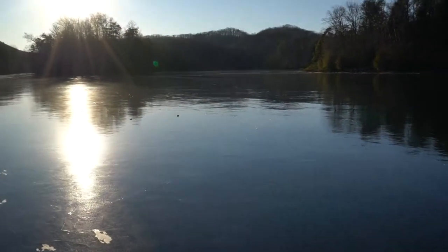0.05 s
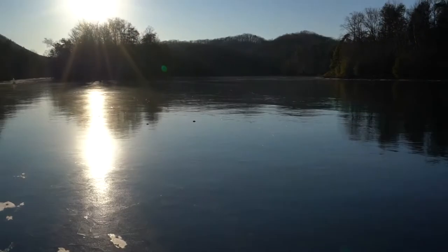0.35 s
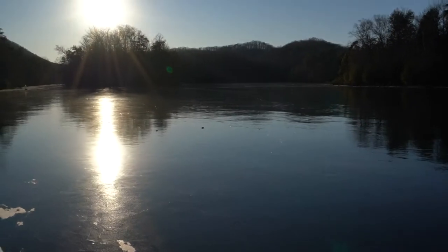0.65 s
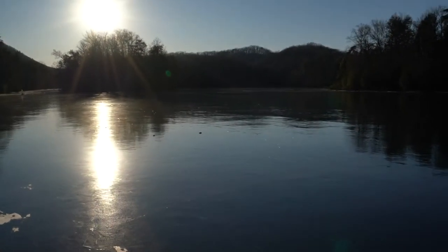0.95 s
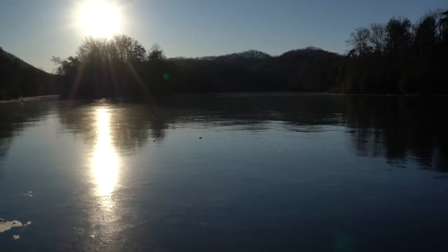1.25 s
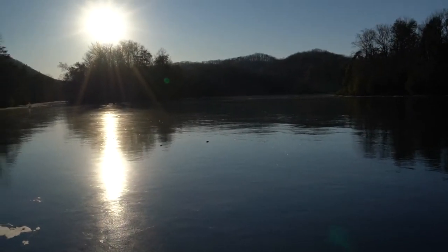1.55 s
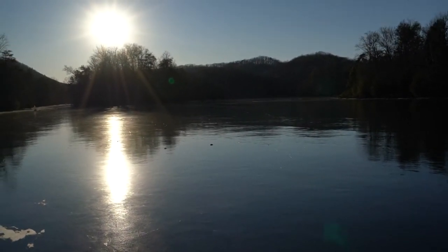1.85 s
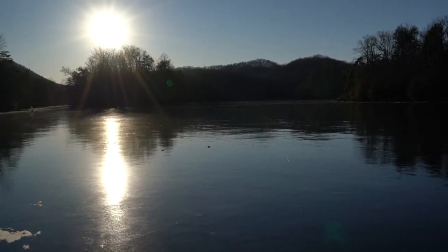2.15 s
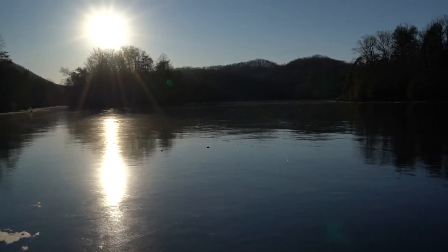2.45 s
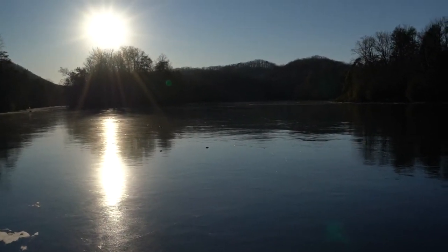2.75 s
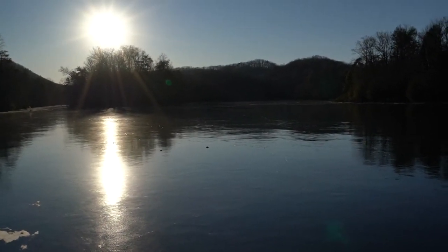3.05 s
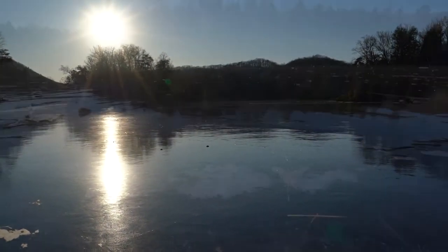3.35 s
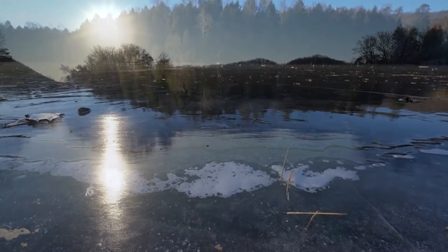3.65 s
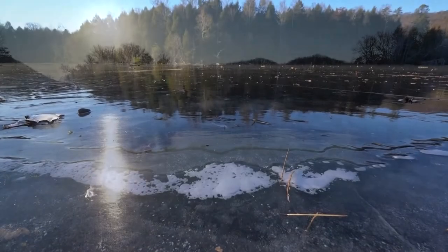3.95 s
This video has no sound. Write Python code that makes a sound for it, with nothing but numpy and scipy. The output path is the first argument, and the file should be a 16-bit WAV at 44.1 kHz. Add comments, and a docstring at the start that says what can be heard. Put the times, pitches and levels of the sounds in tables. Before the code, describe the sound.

Distant cracks in a frozen lake make quick falling chirps in the first half second, merging into a ringing rumble that fades by about 2.5 seconds. Under steady hiss, a low engine-like drone speeds up near 3 seconds. A faint bird whistles twice at 2 seconds. At 3.3 the sound cuts out and fades back in; one ice tone swells around 3.7 as wind rumbles on the microphone.

```python
"""Falling chirps come first: far cracks in a frozen lake, drawn out by the dispersion of bending waves.
Scattered waves merge into a rumble that rings near 270 Hz and dies away. A low drone, like a distant
engine, speeds up under steady hiss, and a far bird whistles twice. The sound cuts out and fades in
at another spot, where one more ice tone swells and wind rumbles on the microphone."""
import sys
import numpy as np
from scipy import signal
from scipy.fft import rfft, irfft
from scipy.io import wavfile

SR = 44100
rng = np.random.default_rng(int(sys.argv[2]) if len(sys.argv) > 2 else 0)


def unload_audio(sound):
    """Save the sound as a 16-bit wav file, at the path given as the first command line argument."""
    columns = np.transpose(np.atleast_2d(sound))
    # keep every value between -1 and 1, then stretch to whole-number steps
    steps = np.round(np.clip(columns, -1, 1) * 32767)
    wavfile.write(sys.argv[1], SR, steps.astype(np.int16))


N = 176400
T, HZ = np.arange(N) / SR, np.fft.rfftfreq(N, 1 / SR)

# Left-right correlation of the ice and of the air: f/Hz, coefficient
ICE_CORRELATION = [(60, 0.97), (200, 1), (550, .88), (1650, 0.75)]
AIR_CORRELATION = [(60, .99), (130, .98), (290, 0.93), (640, 0.7), (1410, 0), (3100, -0.59), (6820, 0.32),
                   (15000, 0)]
# Balance of the ice and of the air at each spot: f/Hz, left minus right/dB
ICE_BALANCE = [(60, 1.5), (180, 1), (550, -1), (1650, 0.5), (4970, -4), (15000, 5)]
FIRST_AIR_BALANCE = [(60, 3), (110, -2), (200, 1.5), (380, 1), (700, 5), (1290, 5.5), (2380, 3), (4400, 1),
                     (8120, 3.0), (15000, 10)]
SECOND_AIR_BALANCE = [(60, 1.5), (110, -2), (200, 1), (380, 1.5), (700, 4), (1290, 8), (2380, 4.5),
                      (4400, -0.5), (8120, 1.0), (15000, 5)]


def amp(db):
    """Amplitude ratio of a level in decibels."""
    return 10 ** (np.asarray(db) / 20)


def unit(x):
    """Normalisation to rms 1."""
    return x / np.sqrt(np.mean(abs(x) ** 2) + 1e-20)


def over_time(rows, column=1):
    """Linear interpolation of a time table at every sample."""
    rows = np.array(rows)
    return np.interp(T, rows[:, 0], rows[:, column])


def over_frequency(rows):
    """Interpolation of a table at every bin, on a logarithmic frequency axis."""
    f, value = np.transpose(rows)
    return np.interp(np.log(HZ + 1), np.log(f + 1), value)


def noise():
    """Spectrum of white noise: equal mean power in every bin."""
    return unit(rfft(rng.standard_normal(N)))


def flutter(depth, cutoff_hz):
    """Random amplitude modulation: a gain that wanders about 1."""
    return 1 + depth * unit(irfft(noise() / (1 + (HZ / cutoff_hz) ** 4), N))


def stereo(a, b, correlation, balance):
    """Mid-side mixing: two independent spectra become partly coherent left and right signals."""
    c = np.clip(over_frequency(correlation), -.95, .999)
    g = amp(over_frequency(balance) / 2)
    mid, side = np.sqrt((1 + c) / 2) * a, np.sqrt((1 - c) / 2) * b
    channels = np.array([(mid + side) * g, (mid - side) / g])
    return irfft(channels * 2 / np.sqrt(g ** 2 + g ** -2 + 2 * c), N)


def air_noise(spectrum, balance):
    """Spectral shaping gives coloured stereo noise; its mid signal has rms 1."""
    gain = amp(over_frequency(spectrum))
    x = stereo(noise() * gain, noise() * gain, AIR_CORRELATION, balance)
    return x / x.mean(0).std()


def dispersion(lag_s, exponent=.75):
    """Bending waves travel slower at low frequencies: an all-pass with zero group delay at 1 kHz."""
    delay = lag_s * ((np.maximum(HZ, 30) / 1000) ** -exponent - 1)
    return np.exp(-2j * np.pi * np.cumsum(delay) * SR / N)


def cracks(scatter_s=.015, gain_db=31):
    """Dispersion turns each crack, an impulse with a cluster of scattered copies, into a falling chirp."""
    # Arrivals: t/s at 1 kHz, relative level/dB, dispersion lag/s, scattered share, tilt/(dB per octave)
    arrivals = [(.077, -6.5, 0.039, 0.98, -1.5), (.169, -5, .039, 0.54, 3.5), (.322, -5, .036, .8, 2),
                (.398, -10, .043, 0.78, -4), (.479, -.5, .043, .2, -2), (1.219, -21, 0.0086, .05, 4)]
    # Spectrum of a crack: f/Hz, relative level/dB
    spectrum = [(40, -33), (110, 0), (200, -15), (270, 2), (350, -6), (560, 1.5), (850, -1.5), (1300, -16),
                (1900, -25.5), (3000, -62)]
    octaves = np.log2(np.clip(HZ, 200, 3000) / 700)
    mid_side = np.zeros((2, len(HZ)), complex)
    for t, db, lag_s, share, tilt in arrivals:
        direct = np.exp(-2j * np.pi * HZ * t)
        cluster = unit(rfft(rng.standard_normal((2, N)) * np.exp(-abs(T - t) / scatter_s)))
        cluster[0] = np.sqrt(share) * cluster[0] + np.sqrt(1 - share) * direct
        gain = amp(db + gain_db + over_frequency(spectrum) + tilt * octaves)
        mid_side += gain * dispersion(lag_s) * cluster
    return stereo(*mid_side, ICE_CORRELATION, ICE_BALANCE)


def scattered_waves(paths=9, waves_per_s=900, spread_db=2.5):
    """Multipath propagation: the spectrum of many small chirps that come by paths of different length."""
    total = 0
    for lag_s in np.linspace(.025, .065, paths):
        sizes = amp(spread_db * np.minimum(rng.exponential(1, N), 3)) * rng.choice([-1, 1], N)
        arrives = rng.random(N) < waves_per_s / paths / SR
        total = total + dispersion(lag_s) * rfft(sizes * arrives)
    return unit(total)


def rumble(split_hz=348):
    """Superposed chirps, scattered across the lake, form a rumble whose lows swell after its highs."""
    # Spectral density of the scattered waves: f/Hz, relative level/dB
    spectrum = [(30, -25), (80, -15), (125, 0), (185, -3.5), (230, 5), (275, 5.5), (330, 3), (420, -0.5),
                (600, -3.5), (900, -9.5), (1400, -15), (2000, -28), (3200, -39.5)]
    # Envelopes below and above the split: t/s, level/dB
    low_level = [(0, -35.5), (.2, -28), (.32, -24.5), (.62, -23.5), (.78, -31.5), (1.2, -40.5), (1.5, -42),
                 (2, -43), (3.3, -69)]
    high_level = [(0, -28.5), (.1, -28), (.4, -26.5), (.6, -30), (.85, -29.5), (1.2, -37), (1.33, -34),
                  (1.55, -43.5), (2, -64), (3.3, -63)]
    a, b = (scattered_waves() * amp(over_frequency(spectrum)) for _ in range(2))
    low = 1 / (1 + (HZ / split_hz) ** 6)
    return sum(unit(stereo(a * band, b * band, ICE_CORRELATION, ICE_BALANCE)) * amp(over_time(level))
               for band, level in [(low, low_level), (1 - low, high_level)])


def ice_ring(centre_hz=271.4, width_hz=52, scatter=.3, side_db=-18, pan_db=-1.5, gain_db=-.2):
    """The sheet radiates best at one drifting pitch; interference with scattered waves makes it beat."""
    # Envelope of the ringing: t/s, relative level/dB
    envelope = [(0.0, -24.5), (0.04, -38), (0.11, -21), (0.17, -29), (0.29, -18), (0.31, -31.5),
                (0.39, -11.5), (0.42, -18.5), (0.48, -11), (0.52, -27), (0.56, -9.5), (0.65, -26.5),
                (0.7, -10.5), (0.73, -11.5), (0.77, -23.5), (0.84, -21), (0.86, -37), (0.89, -17),
                (0.95, -33.5), (1.02, -19), (1.05, -32), (1.12, -21.5), (1.13, -29.5), (1.29, -26),
                (1.32, -53), (1.35, -18.5), (1.39, -41), (1.48, -21), (1.64, -39.5), (1.71, -29),
                (1.82, -40.5), (1.86, -31), (1.89, -52), (1.94, -34), (1.98, -43.5), (2.17, -38.5),
                (2.25, -47), (2.31, -39.5), (2.36, -50), (2.4, -46)]
    # Drift of its pitch: t/s, f/Hz
    pitch = [(0, 274), (.45, 272), (.58, 278.3), (.68, 266), (1.05, 268.5), (2.3, 266.7)]
    resonance = 1 / (1 + 2j * (HZ - centre_hz) / width_hz) ** 2
    beats, side = (unit(irfft(scattered_waves() * resonance, N)) for _ in range(2))
    tone = unit(np.sin(2 * np.pi * np.cumsum(over_time(pitch)) / SR))
    mid, side = unit(tone + scatter * beats), amp(side_db) * side
    decay_db = 11.5 * np.maximum(T - envelope[-1][0], 0)  # 11.5 dB/s once the envelope ends
    gain = amp(over_time(envelope) + gain_db - decay_db)
    return np.array([mid + side, mid - side]) * amp([[pan_db / 2], [-pan_db / 2]]) * gain


def ice_tone(pan_db=2.0):
    """A modulated sinusoid: one clean ice tone swells, bends upward and drops to a short tail."""
    # Course of the tone: t/s, f/Hz, level/dB before the fade-in
    course = [(3.36, 257, -44), (3.5, 265, -46), (3.6, 267.5, -33.5), (3.72, 271.5, -27), (3.8, 284.8, -28),
              (3.812, 285, -49), (3.87, 281, -34), (4, 267, -54)]
    phase = 2 * np.pi * np.cumsum(over_time(course)) / SR
    tone = unit(np.sin(phase)) * flutter(depth=.18, cutoff_hz=35)
    return tone * amp(over_time(course, column=2)) * amp([[pan_db / 2], [-pan_db / 2]])


def engine(harmonics=7):
    """Periodic firing gives a harmonic series, coloured by the long way it travels."""
    # Firing rate: t/s, f/Hz
    firing = [(0.0, 26.05), (0.92, 25.68), (1.18, 27.37), (1.35, 28.4), (1.81, 25.2), (2.39, 25.23),
              (2.64, 26.7), (2.72, 28.6), (2.89, 36.55), (2.97, 38.4), (3.05, 40.07), (3.33, 42.55)]
    # Envelope of the drone: t/s, relative level/dB
    envelope = [(0, -34.5), (1.4, -37.5), (2, -40), (2.7, -42), (3, -37.5), (3.3, -33)]
    # Weight of a harmonic by its frequency: f/Hz, relative level/dB
    spectrum = [(25, -6.5), (40, -3), (52, -9), (66, -1.5), (80, -2.5), (102, -15), (125, -16),
                (160, -10.5), (200, -29.5), (330, -31)]
    f, db = np.transpose(spectrum)
    rate = over_time(firing)
    cycles = np.cumsum(rate) / SR
    drone = 0
    for k in range(1, harmonics + 1):
        gain = amp(np.interp(k * rate, f, db)) * flutter(depth=.27, cutoff_hz=6)
        drone = drone + gain * np.cos(2 * np.pi * (k * cycles + rng.random()))
    return np.sqrt(2) * drone * amp(over_time(envelope))


def bird(right_db=-11):
    """Two linear downward sweeps: the thin whistles of a far bird on the left."""
    # Whistles: onset t/s, duration/s, first f/Hz, last f/Hz, level/dB on the left
    whistles = [(2.011, 0.09, 4576, 4465, -49), (2.12, 0.074, 4500, 4265, -51)]
    song = 0
    for t, length_s, from_hz, to_hz, db in whistles:
        progress = np.clip((T - t) / length_s, 0, 1)
        cycles = np.cumsum(from_hz + (to_hz - from_hz) * progress) / SR
        envelope = np.sqrt(2 * abs(np.sin(np.pi * progress)))
        song = song + amp(db) * envelope * np.sin(2 * np.pi * cycles)
    return song * amp([[0], [right_db]])


def wind(final_db=-29.5, rise_db_per_s=13.5):
    """Pressure fluctuations of a building gust rumble on the microphone."""
    # Spectral density of the gust: f/Hz, relative level/dB
    spectrum = [(12, -11), (35, 1), (70, 3), (110, -5), (200, -11.5), (400, -21), (1000, -73)]
    return air_noise(spectrum, SECOND_AIR_BALANCE) * amp(final_db + rise_db_per_s * (T - T[-1]))


def fizz(centre_hz=11200, half_width_hz=2000):
    """Band-limited noise: the highest hiss swells briefly on the left and later gives one tiny tick."""
    band = 1 / (1 + ((HZ - centre_hz) / half_width_hz) ** 4)
    hiss = unit(stereo(noise() * band, noise() * band, AIR_CORRELATION, FIRST_AIR_BALANCE))
    swell = amp(-45.5) * np.exp(-((T - 1.35) / .25) ** 2)
    tick = amp(-29.5) * np.exp(-abs(T - 2.2755) / .0006)
    return hiss * (swell + tick)


def first_air():
    """Nearly stationary broadband noise: air and hiss at the first spot."""
    # Spectral density: f/Hz, relative level/dB
    spectrum = [(20, -8), (60, -15.5), (150, -3), (300, -1), (600, -7.5), (1200, -9.5), (2000, -14.5),
                (3000, -19.5), (4500, -16.5), (6500, -13.5), (8200, -17), (10500, -16.5), (15500, -20.5)]
    # Slow drift: t/s, level/dB
    envelope = [(0, -38.5), (1.3, -36.5), (2.2, -37.5), (2.8, -38), (3.3, -36.5)]
    return air_noise(spectrum, FIRST_AIR_BALANCE) * amp(over_time(envelope))


def second_air(level_db=-39):
    """Stationary broadband noise: air and hiss at the second spot."""
    # Spectral density: f/Hz, relative level/dB
    spectrum = [(20, -6), (150, 4.5), (400, -1.5), (700, -2), (1200, -6.5), (2000, -8.5), (3000, -17),
                (4500, -14.5), (6500, -12.5), (8200, -15.5), (10500, -16), (15500, -19.5)]
    return air_noise(spectrum, SECOND_AIR_BALANCE) * amp(level_db)


def scene(cut_s=3.337, fade_in_s=.63):
    """Sources add by superposition at each spot; the first stops dead and the second fades in."""
    first = cracks() + rumble() + ice_ring() + bird() + fizz() + engine() + first_air()
    second = ice_tone() + wind() + second_air()
    before_cut = np.clip((cut_s - T) / .0017, 0, 1)
    fade_in = .014 + np.clip((T - cut_s) / fade_in_s, 0, 1) ** 1.017
    return first * before_cut + second * fade_in * (1 - before_cut)


def record(dry, cutoff_hz=15800):
    """A linear-phase low-pass filter limits the bandwidth."""
    lowpass = signal.firwin(1023, cutoff_hz, window=("kaiser", 9), fs=SR)
    return signal.oaconvolve(dry, lowpass[None], "same")


dry = scene()
out = record(dry)
unload_audio(out)
```